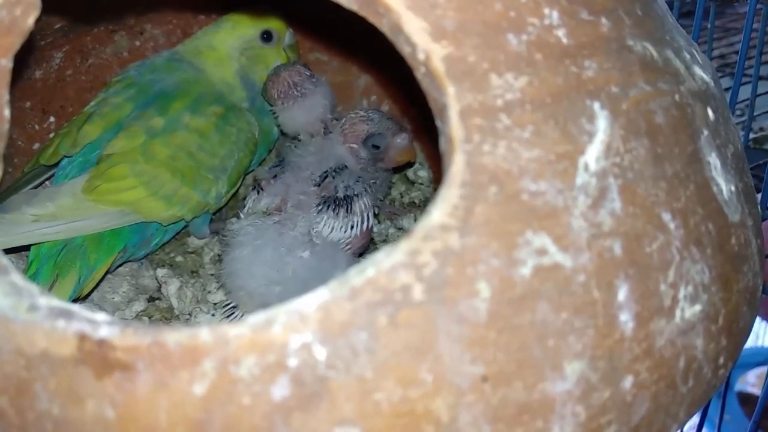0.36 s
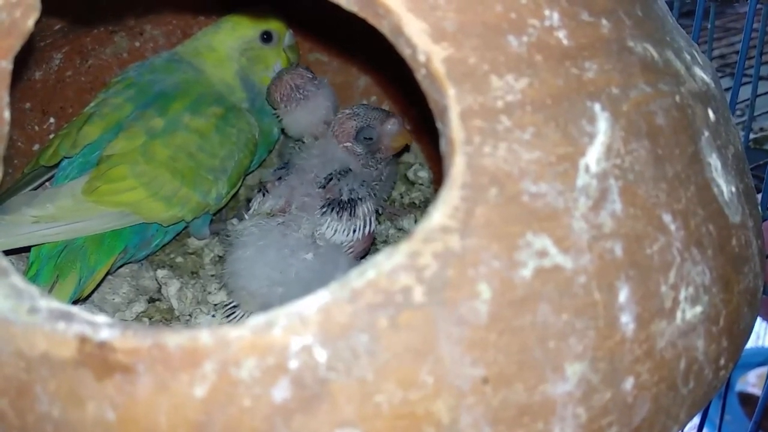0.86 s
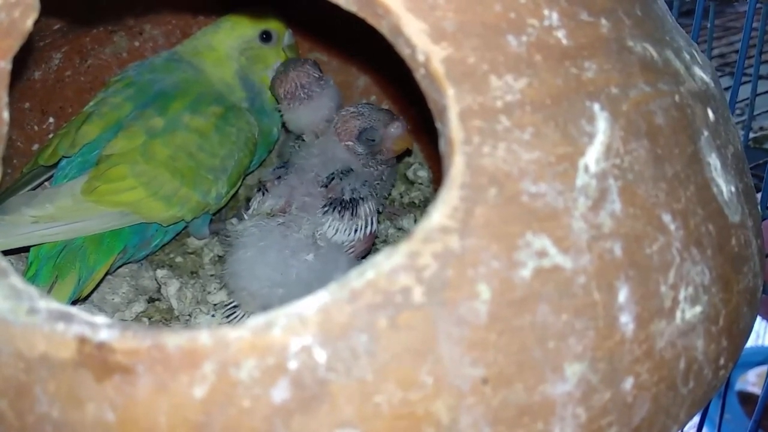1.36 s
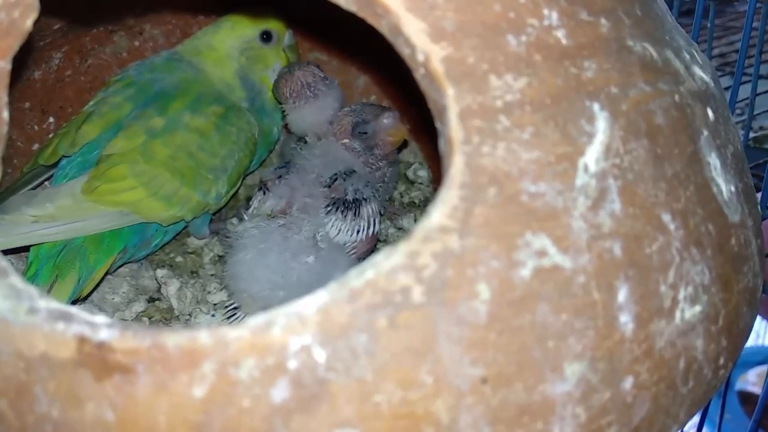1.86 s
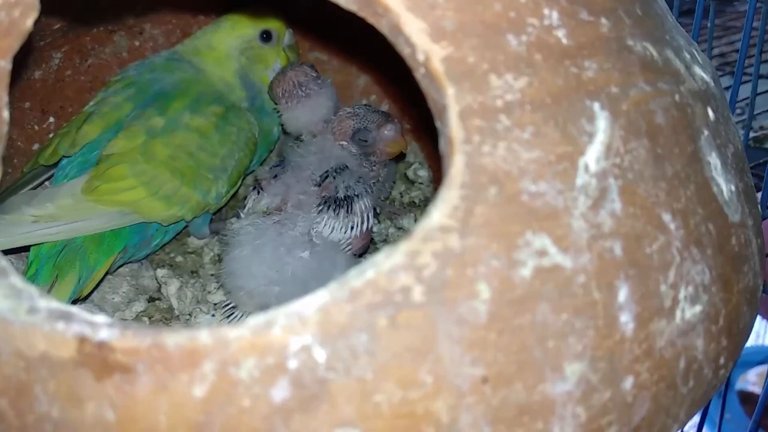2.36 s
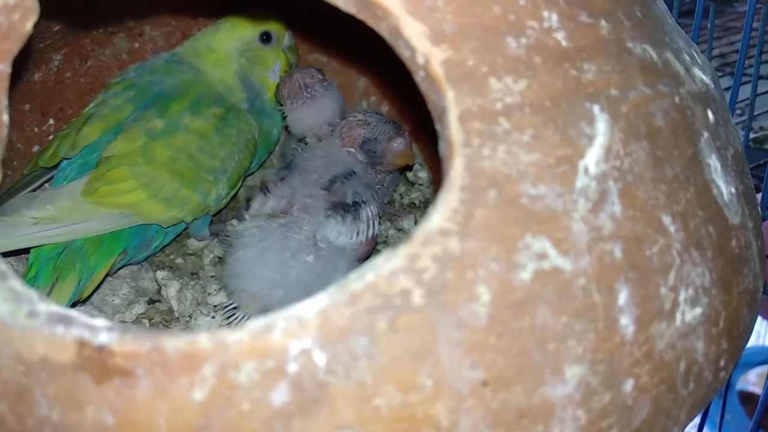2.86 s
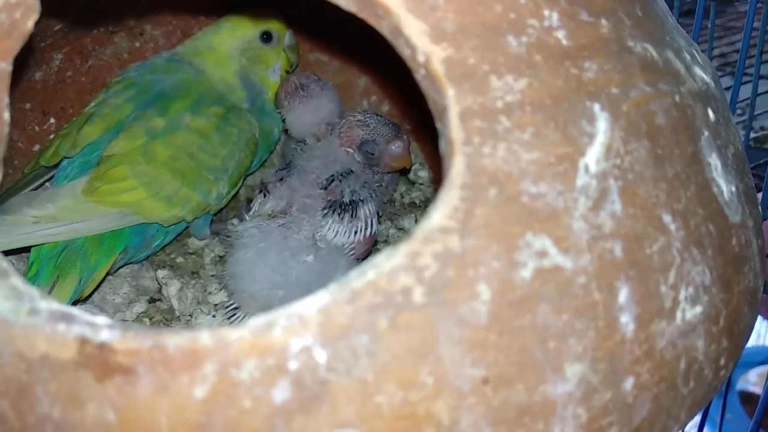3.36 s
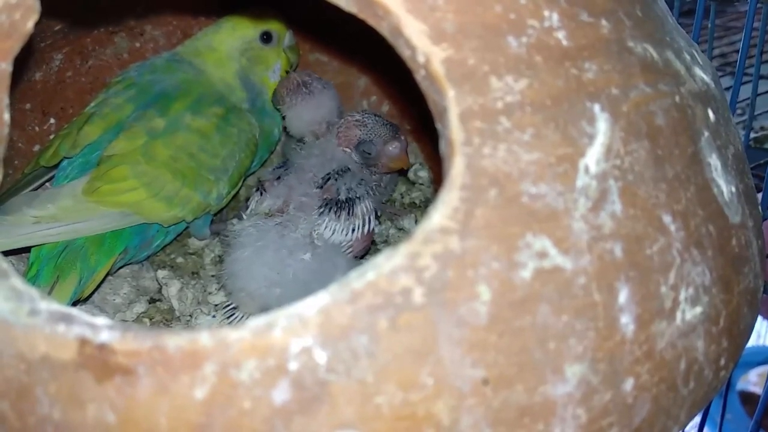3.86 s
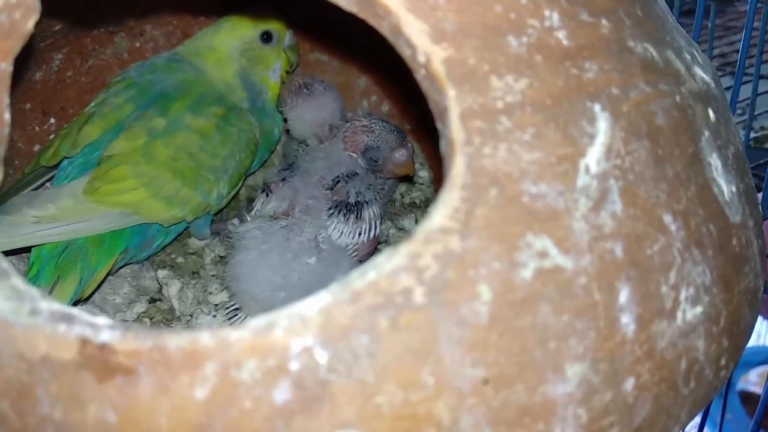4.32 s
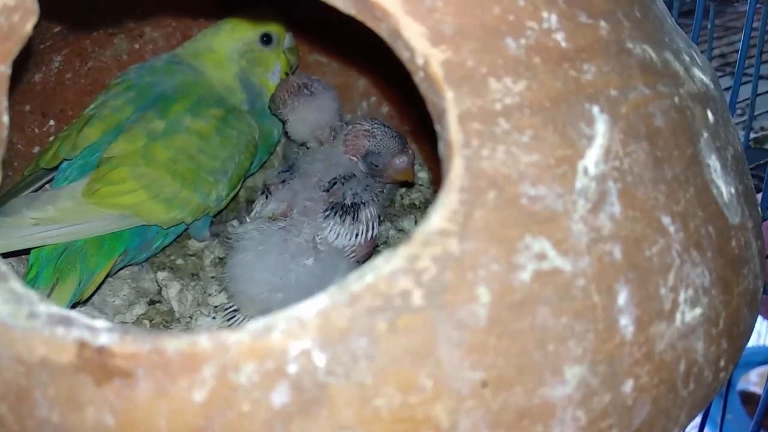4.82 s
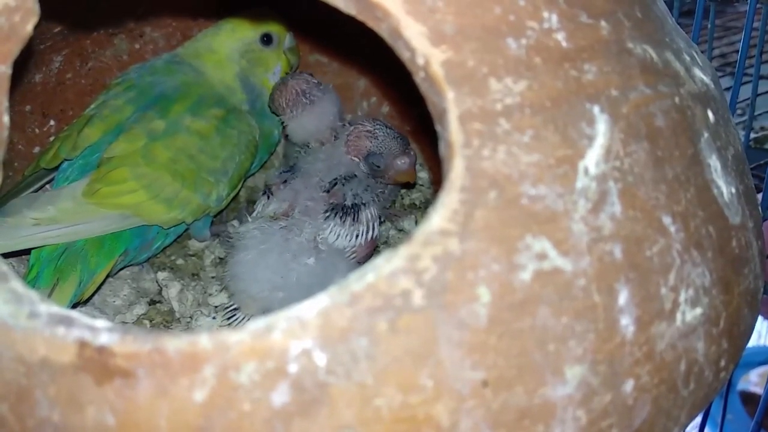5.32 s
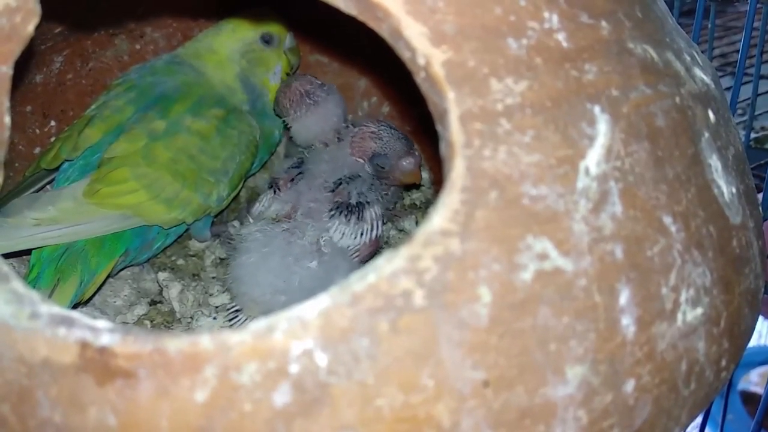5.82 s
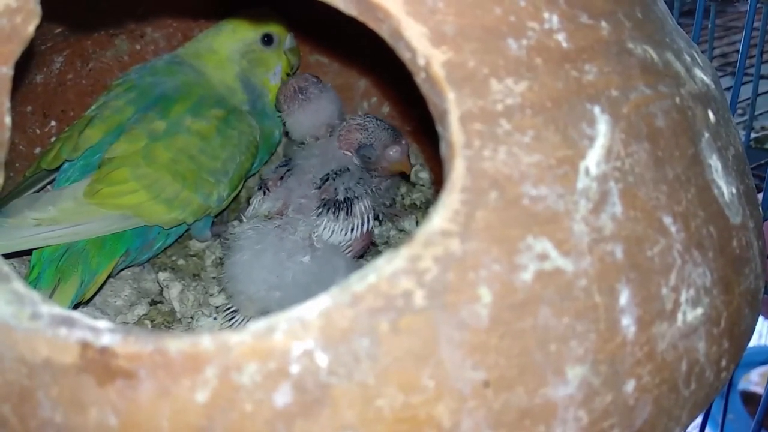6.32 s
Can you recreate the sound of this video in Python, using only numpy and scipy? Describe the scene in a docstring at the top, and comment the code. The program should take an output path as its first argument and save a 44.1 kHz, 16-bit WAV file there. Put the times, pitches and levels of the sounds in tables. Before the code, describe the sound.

Baby budgerigars beg in a squeaky, raspy chorus, with sharp high peeps and short chirps over the dense chatter of an aviary.

```python
"""A chick's arched peeps and hoarse begging rasps come first, among the chirps of near birds in an aviary.
Peeps, chirps, slides and soft low notes are gliding sines with overtones, unsteady in pitch and strength.
Rasps are short torn squeaks in breath and hiss; the crowd behind is hundreds of blurred chance notes.
A few soft bumps and quiet streaky air lie beneath. Walls answer the birds; a small microphone distorts a little."""
import sys
import numpy as np
from scipy import signal
from scipy.fft import rfft, irfft, next_fast_len
from scipy.io import wavfile
from scipy.ndimage import uniform_filter1d, map_coordinates

SR = 44100
rng = np.random.default_rng(int(sys.argv[2]) if len(sys.argv) > 2 else 0)


def master(y):
    """Save y as 16-bit WAV."""
    cut = np.clip(np.atleast_2d(y).T, -1, 1)
    pcm = np.round(cut * 32767)  # scale
    wavfile.write(sys.argv[1], SR, pcm.astype(np.int16))


def gain_from_db(level_db):
    """Convert decibel levels to linear amplitude factors (20 dB per decade)."""
    decades = np.asarray(level_db, float) / 20
    return 10 ** decades


N = 295029  # length [samples]

# Levels are relative: the strength of each voice wavers around them.
# chick's peeps: (time [s], length [s], top pitch [Hz], level [dB])
PEEPS = [(.0, .018, 4500, -31), (.061, .025, 4450, -28), (.488, .017, 4250, -33), (.512, .03, 4600, -30),
         (.576, .028, 4420, -27), (.638, .03, 4350, -30), (1.037, .022, 4200, -33),
         (1.153, .022, 4380, -31), (1.178, .033, 4620, -29), (1.243, .031, 4680, -30),
         (1.312, .025, 4420, -29), (1.675, .022, 4450, -34), (1.7, .035, 4700, -28),
         (1.77, .025, 4700, -27), (1.83, .029, 4530, -29), (2.342, .026, 4550, -32),
         (2.373, .031, 4800, -29), (2.441, .025, 4500, -31), (2.503, .028, 4520, -31),
         (2.563, .026, 4420, -32), (3.232, .026, 4380, -28), (3.281, .022, 4250, -31),
         (5.12, .026, 4500, -30), (5.181, .03, 4520, -28), (5.675, .018, 4400, -27),
         (5.699, .034, 4720, -28), (5.77, .028, 4500, -25), (5.836, .028, 4520, -28),
         (6.535, .03, 4380, -33)]
# single near chirps: (time [s], length [s], middle pitch [Hz], level [dB])
CHIRPS = [(0.068, 0.021, 2845, -22), (0.168, 0.044, 2856, -27), (0.264, 0.078, 2255, -40),
          (.313, 0.027, 2570, -25), (0.47, 0.042, 2560, -33), (0.58, .022, 8900, -36),
          (0.76, 0.038, 2890, -21.5), (0.803, 0.041, 2957, -25), (0.848, 0.037, 2840, -35),
          (0.855, 0.045, 3800, -37), (1.02, 0.019, 3010, -22.5), (1.173, 0.015, 6620, -36.5),
          (1.802, 0.053, 8020, -38), (1.856, 0.035, 2750, -37), (1.933, 0.032, 2980, -24.5),
          (2, 0.017, 2980, -22.5), (0.657, 0.028, 2260, -26.5), (2.073, 0.02, 2337, -24),
          (2.386, 0.017, 9500, -31.5), (2.418, 0.075, 2940, -21), (2.596, 0.016, 2320, -19),
          (2.736, 0.0098, 2830, -23), (2.804, 0.053, 2910, -23.5), (3.097, 0.049, 3042, -15),
          (3.136, 0.05, 3120, -25), (3.312, 0.021, 6000, -23.5), (3.376, 0.025, 2990, -44),
          (3.546, 0.091, 2930, -31), (3.617, 0.019, 2810, -34), (3.72, 0.033, 3090, -20.5),
          (3.849, 0.019, 2750, -24.5), (3.91, 0.028, 5650, -27), (4.014, 0.077, 3686, -26),
          (4.03, 0.01, 2940, -14.5), (4.124, 0.015, 3100, -24), (4.218, 0.025, 2335, -16.5),
          (4.318, 0.046, 2910, -23), (4.384, 0.039, 2944, -21), (4.393, 0.065, 5640, -30),
          (4.518, 0.031, 8060, -32), (4.519, 0.01, 3100, -17), (4.557, 0.016, 7600, -29.5),
          (4.563, 0.016, 3140, -21), (4.592, 0.033, 4200, -30), (4.624, 0.014, 3310, -21),
          (4.65, 0.023, 2695, -20), (4.674, 0.015, 3120, -18.5), (4.676, 0.019, 5740, -23),
          (4.712, 0.026, 2264, -21), (4.698, 0.043, 5820, -28.5), (4.774, 0.02, 2570, -25),
          (4.832, 0.035, 2910, -18.5), (4.928, 0.027, 5430, -20), (4.982, 0.037, 2930, -21.5),
          (5.3, 0.029, 3730, -39), (5.379, 0.085, 2882, -22), (5.455, 0.02, 7800, -23.5),
          (5.521, 0.023, 3650, -33), (5.634, 0.026, 7670, -36), (5.746, 0.059, 2520, -29),
          (5.793, 0.047, 3020, -19), (5.818, 0.015, 8840, -22), (5.906, 0.05, 2896, -25.5),
          (5.951, 0.1, 2690, -32.5), (6.055, 0.022, 3070, -28.5), (6.141, 0.048, 2975, -22),
          (6.321, 0.049, 2860, -26), (6.36, 0.011, 7700, -30), (6.506, 0.016, 8340, -25),
          (6.62, 0.026, 1623, -30.5), (6.664, 0.049, 3610, -25), (6.666, 0.02, 2865, -19.5)]
# near chirps and thin squeals that slide: (time [s], length [s], first pitch [Hz], last pitch [Hz], level [dB])
SLIDES = [(0.388, 0.018, 6400, 6400, -28), (0.393, 0.13, 5930, 5700, -38.5), (0.509, .05, 6500, 6700, -29),
          (0.566, 0.057, 6050, 6370, -32), (0.605, 0.045, 3234, 2890, -24),
          (2.494, 0.044, 2974, 2833, -17.5), (2.532, 0.035, 2833, 3296, -19),
          (0.625, 0.019, 3900, 4150, -36), (0.781, 0.066, 6420, 6300, -41), (1.036, 0.058, 2650, 2220, -35),
          (1.276, 0.069, 2696, 2516, -27.5), (1.177, 0.068, 1645, 1790, -40.5),
          (1.401, 0.055, 1594, 2090, -38.5), (1.485, 0.064, 2955, 2560, -29), (1.56, 0.13, 1260, 1500, -44),
          (1.798, 0.058, 2757, 2584, -25.5), (1.948, 0.13, 1730, 1580, -47),
          (4.584, 0.039, 7830, 8300, -30), (4.625, 0.045, 8560, 8480, -33), (4.7, 0.093, 8700, 8720, -36),
          (4.732, .075, 6370, 6530, -30.5), (5.011, .06, 3540, 4140, -25), (5.033, 0.061, 7900, 7740, -31),
          (5.201, 0.057, 2510, 3175, -22), (5.251, 0.062, 3190, 2926, -25), (5.363, 0.1, 7150, 7800, -32),
          (6.19, .1, 2270, 2105, -43), (6.348, 0.035, 2240, 2200, -26.5)]
# soft low notes, two coos and at 3.095 s a chirp's low undertone:
# (time [s], length [s], start pitch [Hz], middle pitch [Hz], end pitch [Hz], level [dB])
LOW_NOTES = [(2.17, .14, 575, 530, 480, -49), (3.095, .05, 800, 850, 870, -40),
             (3.28, .09, 260, 260, 255, -41)]
# begging strokes: (time [s], length [s], level [dB], relative hiss [dB], throat resonance [Hz])
RASPS = [(0.005, 0.076, -25.5, 2, 6160), (0.134, 0.058, -35.5, 2.5, 5650),
         (0.201, 0.084, -33.5, -1.5, 5340), (0.3, 0.014, -45, 0, 5700), (0.39, 0.0074, -41, 4, 6160),
         (0.414, 0.14, -38.5, -1, 5850), (0.507, 0.013, -28, 0.5, 6530), (0.562, 0.061, -32, 0.5, 6280),
         (0.64, 0.013, -38, 2, 6630), (0.725, 0.012, -35, -4, 5440), (0.782, 0.023, -38, 7, 6040),
         (0.85, 0.14, -51.5, 9, 5640), (0.997, 0.074, -38.5, 8, 5530.0), (1.169, 0.059, -44.5, 6.5, 5170),
         (1.252, 0.038, -37, 4.5, 5460), (1.32, 0.036, -31.5, 2, 5280), (1.4, 0.056, -62, 17, 5400),
         (1.529, 0.073, -35, 0.5, 5490), (1.61, 0.13, -47.5, -2, 5960), (1.713, 0.014, -34.5, 10, 4940),
         (1.737, 0.088, -31.5, 0, 5470), (1.894, 0.044, -35, 7.5, 6030), (1.973, 0.057, -47, 10, 6040),
         (2.036, 0.053, -33.5, 4.5, 5820), (2.103, 0.052, -27.5, 1, 5890), (2.212, 0.04, -37, 1, 5040),
         (2.292, 0.051, -35, -0.5, 6930), (2.366, 0.03, -40.5, 5, 5230), (2.426, 0.049, -30, 4, 5820),
         (2.515, 0.03, -39.5, 10, 5840), (2.584, 0.04, -33.5, 4.5, 5640), (2.646, 0.032, -29, 1.5, 6270),
         (2.697, 0.043, -20, 0, 5350), (2.77, 0.092, -29.5, 0.5, 5720), (2.846, 0.055, -19, -1.5, 6240),
         (2.929, 0.058, -27, 0, 5350), (3.012, 0.031, -19, 2, 5340), (3.05, 0.071, -27.5, 1.5, 5300),
         (3.13, 0.076, -22, -0.5, 6170), (3.233, 0.043, -29, 2.5, 5280), (3.308, 0.037, -27, 1, 5970),
         (3.36, 0.023, -32, -5, 5550), (3.454, 0.04, -23, 2, 5810), (3.53, 0.06, -30, -2.5, 5210),
         (3.584, 0.035, -25, 2, 5330), (3.64, 0.052, -33, 1, 5520), (3.702, 0.049, -31, 1.5, 5930),
         (3.784, 0.1, -21.5, 1, 6080), (3.936, 0.0085, -27.5, 1, 5670), (3.971, 0.044, -23, -0.5, 5760),
         (4.046, 0.039, -23.5, -0.5, 5900), (4.096, 0.11, -24.5, 0.5, 5290), (4.142, 0.14, -31, 4, 5630),
         (4.298, 0.18, -28.5, 4, 5910), (4.517, 0.019, -26, -0.5, 5180), (4.557, 0.024, -27.5, 1, 5500),
         (4.583, 0.062, -31, 4.5, 6030), (4.634, 0.049, -25, -0.5, 5590), (4.73, 0.092, -36, 7.5, 6370),
         (4.826, 0.092, -27, 4, 5910), (4.908, 0.074, -25.5, 0.5, 5166), (5.005, 0.065, -27, 3.5, 6060),
         (5.09, 0.044, -36, 3, 5150), (5.146, 0.051, -30.5, 4.5, 6200), (5.221, 0.075, -29.5, 3, 5590),
         (5.326, 0.029, -28.5, 1.5, 5960), (5.358, 0.051, -33, 7.5, 5700), (5.427, 0.069, -37.5, 9.5, 5940),
         (5.5, 0.048, -36.5, -1, 5530), (5.634, 0.063, -27, -3, 6070), (5.737, 0.047, -26.5, 1, 6100),
         (5.816, 0.031, -24.5, 2, 6020), (5.854, 0.054, -23, 2.5, 6570), (5.945, 0.08, -27.5, 2, 5700),
         (6.05, 0.057, -31, 3.5, 5140), (6.132, 0.053, -25, 2, 5360), (6.209, 0.08, -23, 0.5, 6180),
         (6.341, 0.027, -28.5, 2, 5290), (6.39, 0.028, -38, 8, 5140), (6.449, 0.015, -41, 9.5, 5750),
         (6.505, 0.018, -43, 12, 5770), (6.552, 0.065, -30, 2, 5310), (6.666, 0.026, -34.5, 3, 5900)]
# spectrum of the rasp's breath: (frequency [Hz], relative density [dB])
BREATH = [(30, -19), (300, -15), (1400, -13), (2700, 0), (3900, -6.5), (4700, -7), (6800, -6.5),
          (7800, -37), (9000, -55)]
# spectrum of the rasp's hissing top: (frequency [Hz], relative density [dB])
HISS = [(6000, -67), (6900, -2), (7600, -0.5), (9300, 0), (10500, -6.5), (13500, -10.5), (16000, -14.5)]
# bouts of crowd chatter: (time [s], length [s], level [dB], usual first pitch [Hz], usual last pitch [Hz])
CHATTER = [(0.009, 0.12, -32.5, 3326, 2730), (0.15, 0.077, -25.5, 2925, 3017),
           (0.304, 0.04, -27, 2910, 2740), (0.381, 0.058, -31.5, 2457, 2586),
           (0.604, 0.16, -29.5, 2943, 2700), (0.673, 0.17, -27, 2797, 2908), (0.9, 0.093, -33, 2820, 2850),
           (1.004, 0.042, -31.5, 3020, 2570), (1.06, 0.018, -33, 2500, 2356),
           (1.152, 0.037, -40.5, 3040, 3320), (1.282, 0.07, -34, 2490, 2710), (1.37, 0.01, -36, 2920, 2930),
           (1.485, 0.066, -32, 2950, 2627), (1.6, 0.17, -38, 2750, 2920), (1.787, 0.12, -29, 2670, 2760),
           (1.912, 0.077, -33.5, 2800, 2990), (1.982, 0.079, -34, 3110, 2965),
           (2.053, 0.036, -33.5, 2290, 2490), (2.19, 0.12, -40, 2960, 2590),
           (2.33, 0.066, -30.5, 3170, 2455), (2.41, 0.17, -21, 2932, 2793),
           (2.59, 0.072, -23.5, 2600, 2685), (2.7, 0.02, -30, 2986, 2870),
           (2.774, 0.097, -26.5, 3040, 2870), (2.967, 0.045, -36.5, 2890, 2970),
           (3.095, 0.064, -30.5, 3150, 2960), (3.2, 0.051, -29.5, 2990, 2930),
           (3.285, 0.14, -27, 2903, 2870), (3.46, 0.059, -28.5, 2600, 3120), (3.55, 0.1, -26, 2910, 2650),
           (3.696, 0.11, -24.5, 3096, 2710), (3.83, 0.082, -27, 2830, 2786),
           (4.014, 0.068, -27, 2943, 3285), (4.081, 0.083, -24.5, 3000, 2966),
           (4.203, 0.049, -27.5, 2400, 2410), (4.294, 0.13, -26.5, 2943, 2887),
           (4.48, 0.13, -24.5, 2947, 3190), (4.61, 0.17, -27, 3094, 2603),
           (4.816, 0.047, -22.5, 2810, 2643), (4.968, 0.067, -22, 2876, 2923),
           (5.08, 0.086, -29.5, 2670, 2740), (5.25, 0.1, -26, 3064, 2884), (5.375, 0.14, -23, 2960, 2862),
           (5.64, 0.1, -32, 2570, 2620), (5.781, 0.016, -31, 3030, 2910), (5.866, 0.15, -33, 2930, 2780),
           (6.138, 0.049, -26, 3033, 3030), (6.21, 0.13, -25.5, 2703, 2746), (6.32, 0.16, -28, 2730, 2946),
           (6.555, 0.11, -29.5, 2670, 2900), (6.66, 0.032, -30.5, 2860, 3124)]
# bouts of higher squawks: (time [s], length [s], level [dB], usual pitch [Hz])
SQUAWKS = [(0.0, 0.1, -43, 3830), (0.127, 0.14, -37, 3590), (0.511, 0.33, -50, 4100),
           (0.842, 0.11, -52, 3780), (1.014, 0.061, -36, 3630), (1.145, 0.071, -48, 4200),
           (1.245, 0.065, -41.5, 3830), (1.303, 0.065, -42, 3960), (1.494, 0.1, -44, 3790),
           (1.69, 0.084, -37, 3790), (1.827, 0.094, -44, 4000), (2.31, 0.27, -34, 3770),
           (2.678, 0.067, -44, 4140), (2.768, 0.067, -42.5, 3620), (3.037, 0.2, -34.5, 3930),
           (3.451, 0.16, -37, 4040), (3.723, 0.24, -35.5, 3870), (4.003, 0.35, -31.5, 3820),
           (4.492, 0.45, -34.5, 3955), (4.872, 0.056, -29.5, 4170), (5.002, 0.17, -29.5, 3816),
           (5.304, 0.2, -26.5, 3640), (5.769, 0.16, -30, 3660), (6.159, 0.13, -28.5, 4300),
           (6.325, 0.13, -34, 4150), (6.544, 0.061, -30.5, 4090), (6.648, 0.042, -34, 3570)]
# bouts of low far warbles: (time [s], length [s], level [dB], usual first pitch [Hz], usual last pitch [Hz])
WARBLES = [(.0, 0.092, -51, 1870, 1730), (.127, 0.042, -42.5, 1640, 1586), (.36, 0.34, -46, 1466, 1635),
           (.682, 0.22, -40, 1794, 1758), (.97, 0.1, -41, 1823, 1637), (1.176, 0.044, -43.5, 1592, 1750),
           (1.329, 0.15, -46, 1568, 1820), (1.517, 0.2, -39.5, 1397, 1780),
           (1.882, 0.12, -36.5, 1670, 1584), (2.09, 0.03, -41, 1790, 1720), (2.288, 0.078, -40, 1360, 1607),
           (2.626, 0.069, -36, 1745, 1620), (2.961, 0.048, -40, 1656, 1710),
           (3.576, 0.18, -37.5, 1596, 1665), (4.038, 0.14, -44, 1708, 1566),
           (4.31, 0.14, -35.5, 1500, 1730), (4.7, 0.11, -35.5, 1787, 1650),
           (5.304, 0.067, -36.5, 1616, 1600), (5.756, 0.072, -39.5, 1533, 1626),
           (5.885, 0.3, -37, 1462, 1652), (6.308, 0.23, -36, 1864, 1706), (6.603, 0.013, -49, 1580, 1600)]
# spectrum of noise that swells with the crowd: (frequency [Hz], relative density [dB])
BUSTLE = [(60, -30), (200, -10), (700, 3), (1300, 3.5), (2000, -3), (4000, -17), (9000, -13), (16000, -24)]
# decay of the walls' answer: (frequency [Hz], time to fall 60 dB [s])
WALL_DECAY = [(500, 0.16), (3000, 0.15), (10000, 0.061)]
# soft low bumps against the microphone: (time [s], relative level [dB])
BUMPS = [(0.609, -64), (1.029, -66), (2.304, -66), (3.44, -72), (4.081, -59), (4.571, -60), (5.021, -57.5),
         (5.36, -55), (6.54, -60.5)]
# tone of the bumps: (frequency [Hz], gain [dB])
BUMP_TONE = [(20, 19.5), (120, 18.5), (300, 18), (1000, -12)]
# spectrum of the aviary's air: (frequency [Hz], relative density [dB])
AIR = [(15, -57), (25, -21), (108, -18), (230, -2), (330, -6), (800, -9.5), (1370, 3), (1520, -1.5),
       (2350, 8.5), (2910, -47), (3920, -8), (5730, -6.5), (12900, -13.5), (16000, -20)]

# the higher a peep reaches over the easy pitch, the lower it drops after
PEEP_FOOT_HZ, PEEP_EASY_HZ, PEEP_OVERSHOOT, PEEP_LOWEST_HZ = 3740, 4330, 1.6, 3480
CHIRP_GLIDE = 0.031  # usual bend of a chirp's ends, share of its pitch
RASP_RISE_DB_PER_S, RASP_FALL_DB_PER_S, RASP_REST_DB = 1500, 453, -74
# far calls swell and die more slowly; between bouts a murmur stays
FAR_RISE_DB_PER_S, FAR_FALL_DB_PER_S = 411, 234
CHATTER_REST_DB, SQUAWK_REST_DB, WARBLE_REST_DB = -60, -62, -50


def chick():
    """Peeps climb, crest late and drop steeply, with a weak octave; far falls land on a short flat note."""
    voice = dict(waver=.005, throb_db=3.5, throb_hz=140, overtones_db=[-17], edge=.16)
    arcs, landings = [], []
    for s, length, top_hz, db in PEEPS:
        drop_hz = PEEP_OVERSHOOT * max(top_hz - PEEP_EASY_HZ, 0)
        end_hz = max(PEEP_FOOT_HZ + 100 - drop_hz, PEEP_LOWEST_HZ)
        arcs.append((s, length, PEEP_FOOT_HZ, top_hz, end_hz, db))
        if end_hz < 3620:
            landings.append((s + length - .002, .016, end_hz, end_hz + 30, end_hz, db))
    peeps = notes(arcs, bend=2.4, strain_db=48, crest=.66, **voice)
    return gain_from_db(2.5) * peeps + notes(landings, **voice)


def chirps():
    """Near birds whistle hoarsely; mid-pitched chirps carry a faint undertone at a third of their pitch."""
    ends = 1 + CHIRP_GLIDE * rng.standard_normal((len(CHIRPS), 2))
    arcs = [(s, length, hz * a, hz, hz * b, db) for (s, length, hz, db), (a, b) in zip(CHIRPS, ends)]
    whistles = notes(arcs, waver=.008, throb_db=3.4, throb_hz=260, overtones_db=[-20, -24], edge=.2)
    thirds = [(s, length, a / 3, b / 3, c / 3, db) for s, length, a, b, c, db in arcs if 2500 < b < 3300]
    undertone = notes(thirds, waver=0.057, throb_db=6.0, throb_hz=86.45, overtones_db=[-6], edge=0.33)
    return whistles + gain_from_db(-26.0) * undertone


def slides():
    """Near birds whose note slides straight from one pitch to another."""
    arcs = [(s, length, a, (a + b) / 2, b, db) for s, length, a, b, db in SLIDES]
    return notes(arcs, waver=.011, throb_db=4.5, throb_hz=300, overtones_db=[-22], edge=.12, bend=1)


def rasps():
    """Begging so hoarse that the pitch breaks up: torn squeaks near the throat resonance, in breath and hiss."""
    gain, _, hiss_db, throat_hz = bouts(RASPS, RASP_RISE_DB_PER_S, RASP_FALL_DB_PER_S, RASP_REST_DB)
    torn = dict(waver=0.018, throb_db=-1.5, throb_hz=448.7, overtones_db=[], edge=0.13)
    squeaks = notes(flock(count=1900, centre_hz=throat_hz, spread=0.14, glide=0.02, length=0.019), **torn)
    shrill_hz = np.full(N, 8500.)
    shrill = notes(flock(count=800, centre_hz=shrill_hz, spread=0.088, glide=0.02, length=0.025), **torn)
    # the uneven slapping of the syrinx chops the whole voice
    slaps = unit(gain_from_db(1.7 * wobble(650).clip(-2, 1.5)))
    voiced = gain_from_db(-2) * steady(unit(squeaks), .04)
    body = voiced + gain_from_db(-5.5) * streaky(BREATH, patchy_db=4.0)
    top = gain_from_db(-11.0) * steady(unit(shrill), 0.012) + gain_from_db(-6.5) * streaky(HISS, patchy_db=2.0)
    return gain * slaps * (body + gain_from_db(hiss_db) * top)


def low_notes():
    """Two coos and a chirp's low undertone: soft low tones with slow edges and a weak octave."""
    return notes(LOW_NOTES, waver=0.0087, throb_db=-2.0, throb_hz=29.8, overtones_db=[-20], edge=0.63, bend=0.86)


def crowd():
    """Many overlapping notes blur into bands: chatter, squawks above, low warbles and a noisy bustle."""
    far = FAR_RISE_DB_PER_S, FAR_FALL_DB_PER_S
    chatter_gain, done, first_hz, last_hz = bouts(CHATTER, *far, CHATTER_REST_DB)
    chatter_hz = first_hz + (last_hz - first_hz) * done
    squawk_gain, _, squawk_hz = bouts(SQUAWKS, *far, SQUAWK_REST_DB)
    warble_gain, done, first_hz, last_hz = bouts(WARBLES, *far, WARBLE_REST_DB)
    warble_hz = first_hz + (last_hz - first_hz) * done

    chatter = far_band(flock(count=520, centre_hz=chatter_hz, spread=.1, glide=0.0447, length=.025))
    squawks = far_band(flock(count=650, centre_hz=squawk_hz, spread=0.096, glide=0.0408, length=.03))
    warbles = far_band(flock(count=130, centre_hz=warble_hz, spread=.06, glide=0.0706, length=0.064), waver=0.018)
    bustle = gain_from_db(-23) * np.hypot(chatter_gain, 3 * warble_gain) * streaky(BUSTLE, patchy_db=7.0)
    return bustle + chatter_gain * chatter + squawk_gain * squawks + warble_gain * warbles


def far_band(rows, waver=0.014):
    """Hoarse far birds heard half off the walls, their loudness evened out."""
    calls = notes(rows, waver=waver, throb_db=5.0, throb_hz=308.4, overtones_db=[-18, -24], edge=0.21)
    return steady(unit(calls + gain_from_db(-3.5) * walls(calls)), 0.086)


def bumps():
    """Dull bumps on the microphone: low-toned noise that swells briefly and dies away."""
    out, t = np.zeros(N + SR), np.arange(SR // 5) / SR
    for s, db in BUMPS:
        swell = t / 0.011 * np.exp(1 - t / 0.036)
        out[int(s * SR):][:len(t)] += gain_from_db(db) * swell * rng.standard_normal(len(t))
    return coloured(out[:N], BUMP_TONE)


def air():
    """The quiet rush of the place: streaky noise whose level drifts slightly."""
    return gain_from_db(-39.0 + 0.88 * wobble(6.01)) * streaky(AIR, patchy_db=2.5)


def walls(x, turn=SR // 4):
    """Each frequency of the answer dies at its own speed; birds move, so every turn [samples] gets a new one."""
    out = np.zeros(N + 2 * SR)
    for start in range(0, N, turn):
        hz, t, z = signal.stft(rng.standard_normal(SR // 3), SR, nperseg=256)
        decay = gain_from_db(-60 * t / along(WALL_DECAY, hz)[:, None])
        tail = signal.istft(z * decay, SR, nperseg=256)[1]
        wet = signal.fftconvolve(x[start:start + turn], tail / np.linalg.norm(tail))
        out[start + 200:][:len(wet)] += wet
    return out[:N]


def notes(rows, waver, throb_db, throb_hz, overtones_db, edge, bend=2, strain_db=0, crest=0.506):
    """Whistled notes on a three-point arc; the syrinx wavers in pitch and throbs in strength."""
    out, pitch, throb = np.zeros(N + SR), wobble(throb_hz), wobble(1.5 * throb_hz)
    for k, (s, length, start_hz, mid_hz, end_hz, db) in enumerate(rows):
        # u runs from -1 at the start through 0 at the crest to 1 at the end
        u = np.interp(np.linspace(0, 1, int(length * SR) + 2), [0, crest, 1], [-1, 0, 1])
        at = (np.arange(len(u)) + 7919 * k) % N  # each note has its own unsteadiness
        hz = mid_hz + np.where(u < 0, start_hz - mid_hz, end_hz - mid_hz) * np.abs(u) ** bend
        phase = 2 * np.pi * np.cumsum(hz * (1 + waver * pitch[at])) / SR
        tone = np.sin(phase)
        for order, overtone_db in enumerate(overtones_db, 2):
            if order * mid_hz < SR / 3:
                tone += gain_from_db(overtone_db) * np.sin(order * phase)
        # above its easy range the voice thins by strain_db per kHz
        strain = strain_db * np.clip(hz - 4500, 0, None) / 1000
        swell = np.clip((1 - np.abs(u)) / edge, 0, 1)
        out[max(int(s * SR), 0):][:len(u)] += gain_from_db(db + throb_db * throb[at] - strain) * swell * tone
    return out[:N]


def flock(count, centre_hz, spread, glide, length):
    """Rows of chance notes, one per equal time slot, scattered around a moving pitch; length [s]."""
    chance = rng.standard_normal((count, 5)).clip(-1.8, 1.8)
    s = (np.arange(count) + rng.random(count)) * N / SR / count
    mid_hz = centre_hz[(s * SR).astype(int)] * np.exp(spread * chance[:, 0])
    span = length * np.exp(.4 * chance[:, 1])
    start_hz = mid_hz * (1 + glide * chance[:, 2])
    end_hz = mid_hz * (1 + glide * chance[:, 3])
    return np.transpose([s - span / 2, span, start_hz, mid_hz, end_hz, 0.68 * chance[:, 4]])


def bouts(rows, rise_db_per_s, fall_db_per_s, rest_db):
    """Gain of calls that rise, hold and die away, then share done and other columns, weighted to the loudest."""
    s, length, db, *cols = np.transpose(rows)[..., None]
    t = np.arange(0, N + 64, 32) / SR
    rise_db = rise_db_per_s * (s - t).clip(0)
    fall_db = fall_db_per_s * (t - s - length).clip(0)
    power = gain_from_db(2 * (db - rise_db - fall_db)) + 1e-30
    done = np.clip((t - s) / length.clip(1e-3), 0, 1)
    gain = np.sqrt(power.sum(0) + gain_from_db(2 * rest_db))
    slow = [gain] + [(power * c).sum(0) / power.sum(0) for c in [done] + cols]
    return [np.interp(np.arange(N) / SR, t, c) for c in slow]


def streaky(spectrum, patchy_db):
    """Noise of rms 1 whose narrow bands swell and fade on their own."""
    z = signal.stft(rng.standard_normal(N), nperseg=256)[2]
    field = uniform_filter1d(rng.standard_normal(z.shape), size=2, axis=0)
    field = uniform_filter1d(field, size=10, axis=1)
    noise = signal.istft(z * gain_from_db(patchy_db * unit(field)), nperseg=256)[1][:N]
    return unit(coloured(noise, spectrum))


def coloured(x, spectrum):
    """x filtered through (frequency [Hz], gain [dB]) points."""
    m = next_fast_len(N + SR // 4)
    return irfft(rfft(x, m) * gain_from_db(along(spectrum, np.fft.rfftfreq(m, 1 / SR))), m)[:N]


def along(points, hz):
    """(frequency [Hz], value) points read on a log frequency axis."""
    f, v = np.transpose(points)
    return np.interp(np.log(hz + 1), np.log(f + 1), v)


def wobble(rate):
    """A smooth random curve, rate knots a second, 2000 at most."""
    return map_coordinates(rng.standard_normal(N // 20), [np.arange(N) * min(rate, 2000) / SR])


def steady(x, seconds):
    """x with its slow loudness evened out to about rms 1."""
    return x / np.sqrt(np.abs(uniform_filter1d(x ** 2, int(seconds * SR))) + 1e-3)


def unit(x):
    """x at rms 1."""
    return x / np.sqrt(np.mean(x ** 2) + 1e-20)


def scene():
    """Near voices with the walls' answer, the crowd, the bumps and the air, in one channel."""
    near = chick() + chirps() + slides() + rasps() + low_notes()
    return (near + gain_from_db(-11) * walls(near) + crowd() + bumps() + air())[None]


def roll_off(x):
    """The treble ends steeply here."""
    return signal.sosfilt(signal.butter(12, 15850, fs=SR, output="sos"), x)


def record(dry):
    """A lopsided microphone puts the envelope of loud calls into the bass and rounds off the peaks."""
    square = dry ** 2
    bent = dry + gain_from_db(-17.5) * (square - uniform_filter1d(square, SR // 30))
    soft = bent / (1 + np.abs(bent / .46) ** 5) ** (1 / 5)
    return roll_off(soft)


dry = scene()
out = record(dry)
master(out)
```